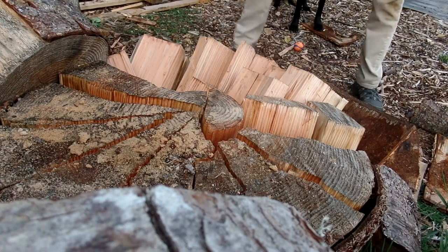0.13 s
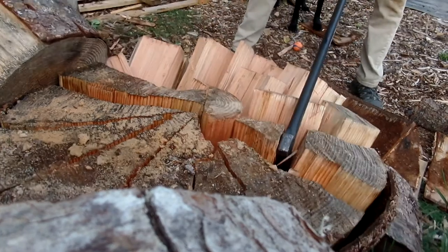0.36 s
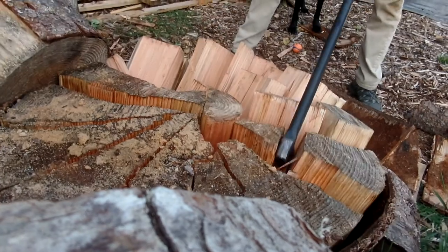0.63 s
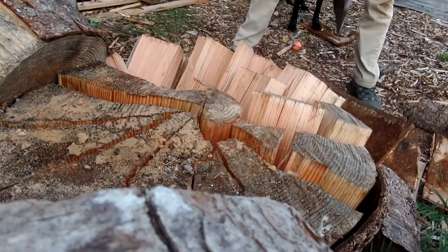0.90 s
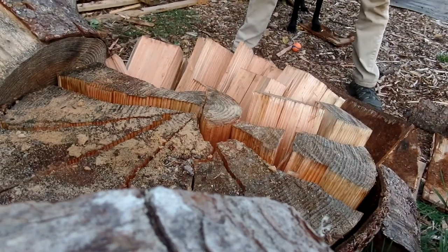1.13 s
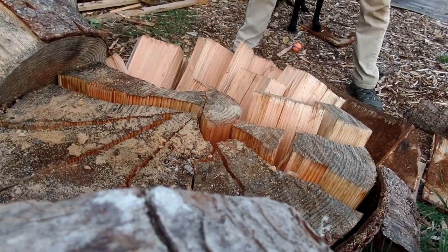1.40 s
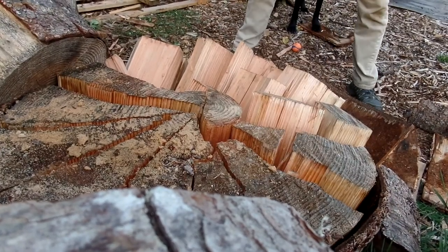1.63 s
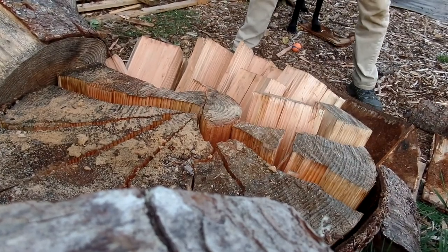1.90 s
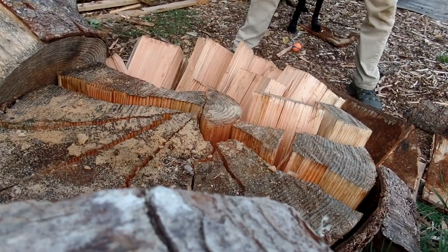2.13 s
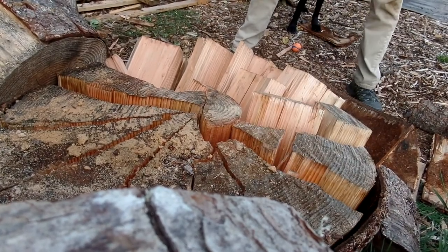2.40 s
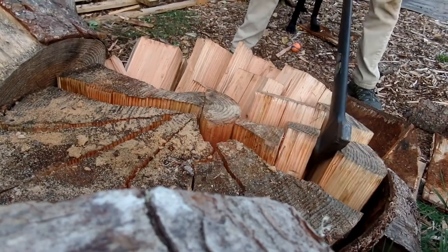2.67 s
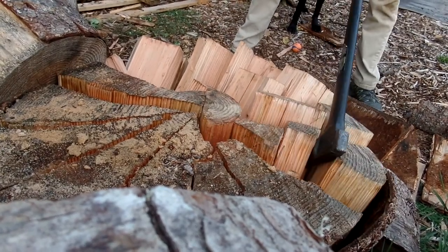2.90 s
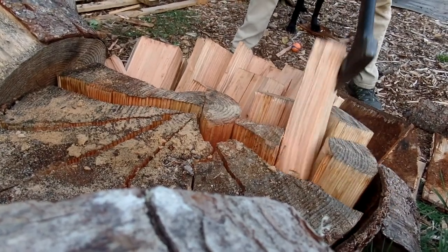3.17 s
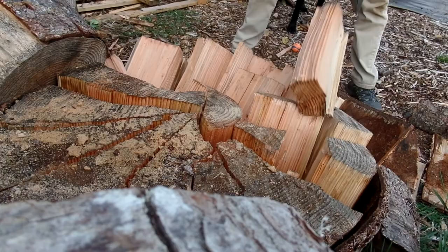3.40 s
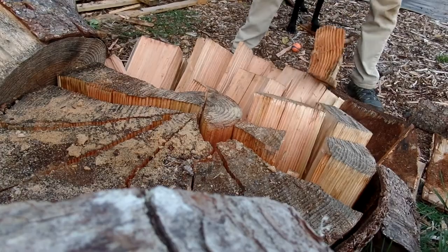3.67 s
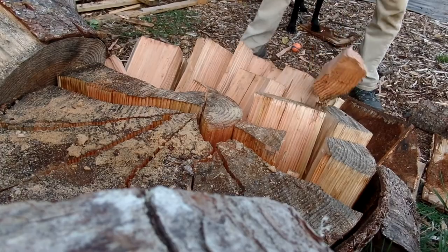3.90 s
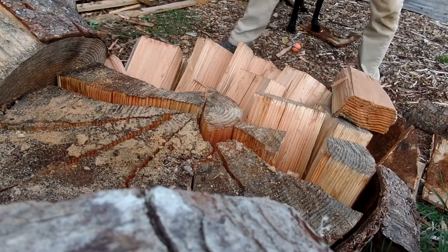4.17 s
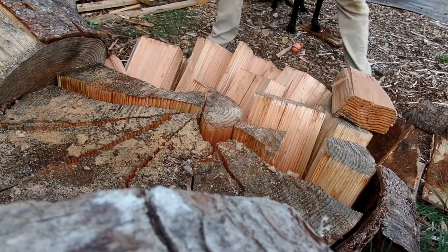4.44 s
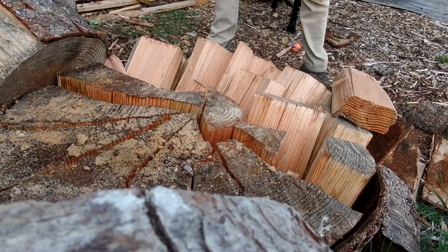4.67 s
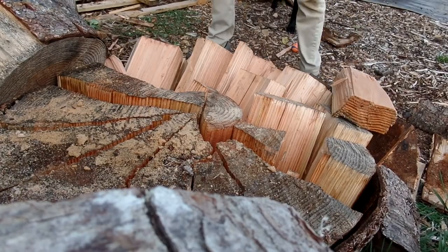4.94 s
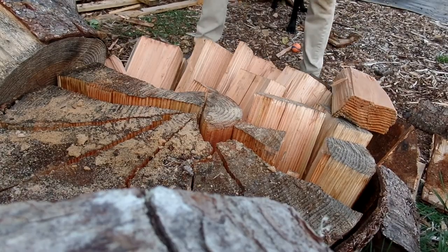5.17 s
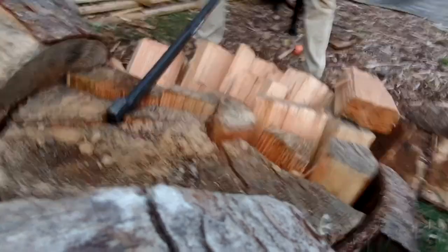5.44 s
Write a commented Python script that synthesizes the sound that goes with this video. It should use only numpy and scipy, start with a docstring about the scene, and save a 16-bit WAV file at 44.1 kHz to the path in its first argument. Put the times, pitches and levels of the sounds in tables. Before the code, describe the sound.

Three overloaded, splintering axe blows on thick wood, separated by rustling clothes, loose wooden clunks and the faint murmur of an open yard.

```python
"""Axe on a log round

An axe bites three times into a thick log round, close to a small microphone that overloads.
Blows and knocks are damped wooden modes; jolts of tearing fibre excite the blows and noise bursts crack above.
Around the blows split pieces knock and tumble, and the axe head drags out of a cut as grainy noise with squeaks.
Clothes and wood chips rustle as swells of bright noise with stray ticks.
Behind lie the shaped-noise murmur of an open yard, low breeze on the microphone and a faint far hum."""
import sys
import numpy as np
from scipy import signal
from scipy.io import wavfile
from scipy.ndimage import uniform_filter1d

SR = 44100
rng = np.random.default_rng(int(sys.argv[2]) if len(sys.argv) > 2 else 0)


def makeup_ratio(level_db):
    """Linear amplitude ratio for a level in decibels (20 dB per factor of ten)."""
    decades = np.asarray(level_db, float) / 20
    return 10 ** decades


def wav_record(signal):
    """Record a signal, one row per channel, as 16-bit PCM in the file named by sys.argv[1]."""
    frames = np.transpose(np.atleast_2d(signal))
    bounded = np.clip(frames, -1, 1)
    # unit amplitude maps onto the largest positive 16-bit level
    quanta = np.round(bounded * 32767).astype(np.int16)
    wavfile.write(sys.argv[1], SR, quanta)


N = 245183  # length [samples]

# Axe blows and the jolts of the splitting wood:
# (time [s], relative force [dB], tearing [s], relative splinter crack [dB], pitch factor of the piece)
AXE_BLOWS = [(0.3042, 11.5, .004, -5.5, 0.98), (.307, 13.5, .016, 4, 1.15),
             (0.3386, -7.5, 0.0022, -11, 1.3), (0.346, -14, 0.002, -25, 1.3),
             (0.357, -25, 0.011, -43, 1.15), (2.513, 9, .013, 5.5, 1.0), (2.533, -12, .006, -16, 0.83),
             (2.565, -30, 0.011, -37.5, 0.93), (5.445, 13, 0.019, 0, 1.07), (5.464, 8.5, .009, 0.5, 1.25),
             (5.481, -17.5, 0.0081, -30.5, 1.16), (5.492, -18, .02, -39, 1.78),
             (5.528, -24.5, 0.013, -30.5, 2.4)]
# Knocks of loose pieces; a piece and the one it lands on each ring:
# (time [s], ring peak [dB], nominal pitch [Hz], relative click [dB], ring t60 before neighbours damp it [s])
PIECE_KNOCKS = [(.188, -36.5, 784, -45.5, .06), (.196, -36, 1410, -50.5, 0.015),
                (.335, -5.5, 310, -52.5, 0.027), (.341, -5.5, 569, -34, 0.036),
                (.394, -27, 998, -55, 0.077), (.403, -30.5, 257, -46, 0.033),
                (.53, -49, 1290, -71.5, 0.033), (.542, -47.5, 242, -51.5, .037),
                (0.556, -59, 755, -55.5, 0.044), (.629, -47, 1730, -51.5, .032),
                (.661, -47, 603, -73, 0.021), (.731, -66, 1760, -53.5, .03),
                (.779, -35.5, 2810, -48, 0.022), (.787, -43, 492, -47.5, 0.029),
                (1.249, -43, 1210, -51, 0.011), (2.547, -10.5, 595, -23.5, 0.054),
                (2.593, -33, 471, -61, 0.067), (2.646, -31.5, 3110, -44.5, 0.015),
                (2.67, -32.5, 967, -52, 0.016), (2.805, -61, 903, -58.5, 0.012),
                (3.008, -61, 2898, -56.5, .012), (3.25, -51, 2020, -52.5, 0.015),
                (3.35, -54, 2000, -55, .015), (3.507, -48, 2830, -41.5, 0.012),
                (3.516, -27, 1234, -35, 0.021), (3.521, -26, 627, -58, 0.0095),
                (3.517, -26, 2900, -57.5, .005), (3.518, -31, 231.5, -54, 0.079),
                (3.615, -45, 261, -65, 0.084), (3.68, -49, 920, -63, 0.056),
                (3.699, -46, 840, -49.5, 0.027), (3.768, -38, 1216, -51.5, .02),
                (3.769, -37, 705, -64.5, 0.016), (3.791, -35, 210, -62, 0.051),
                (3.837, -48, 2740, -53.5, 0.018), (3.856, -30, 756, -44, 0.014),
                (3.875, -30, 1770, -37.5, 0.048), (3.897, -41, 2020, -35, 0.012),
                (3.905, -48, 1520, -46, .012), (3.939, -50, 870, -44, 0.029),
                (3.958, -55, 835, -45.5, 0.028), (4.011, -39, 1355, -57, 0.017),
                (4.14, -16, 420, -33.5, 0.062), (4.138, -13, 247, -45, 0.033), (4.18, -38, 390, -62, 0.051),
                (4.197, -33.5, 234, -64.5, 0.065), (4.201, -42.5, 430, -58.5, 0.057),
                (4.229, -40.5, 427, -66, .043), (4.608, -41, 825, -44, 0.026),
                (4.627, -37, 325, -54.5, 0.041), (4.645, -30, 268, -51.5, 0.031),
                (4.664, -33, 322, -54, 0.039), (4.675, -36.5, 270, -63, 0.056),
                (4.917, -41.5, 370, -54, 0.05), (5.223, -36, 557, -47, 0.022),
                (5.496, -37, 2920, -35.5, .01), (5.53, -33, 1510, -40, 0.028),
                (5.539, -28, 1646, -36, 0.053)]
# Modes of a reference piece of wood, the main one second:
# (frequency [Hz], level [dB], undamped t60 [s])
WOOD_MODES = [(180, -12, 0.031), (421, 4.5, 0.049), (565, -11, 0.14), (699, -4, 0.03), (844, -1.5, .045),
              (1000, -9.5, 0.013), (1290, -10.5, 0.063), (1386, -8.5, 0.032), (1770, -8.5, 0.052),
              (2377, -15.5, 0.051), (2970, -18, 0.024)]
# Colour of cracking splinters: (frequency [Hz], relative level [dB])
SPLINTER_COLOUR = [(1000, -11), (2500, -1), (4500, -4), (6500, -9), (9500, -4), (12000, -19.5),
                   (16000, -21)]
# Decay of the yard's echo tail: (frequency [Hz], t60 [s])
ECHO_DECAY = [(100, 0.27), (400, 0.065), (1500, 0.087), (4000, 0.14), (10000, 0.063)]
# Colour of the distant murmur: (frequency [Hz], relative density [dB/Hz])
MURMUR_COLOUR = [(15, -45), (25, -19), (76, -6.5), (349, -14), (483, -15), (787, -11.5), (1360, -15.5),
                 (1640, -14.5), (2090, -17), (2820, -19.5), (4600, -30.5), (11900, -48), (16500, -50)]
# Colour of clothes and chips: (frequency [Hz], relative density [dB/Hz])
RUSTLE_COLOUR = [(1470, -36), (2500, 0), (4010, -1.5), (4930, 1.5), (8430, 1), (9270, 6), (12000, -11),
                 (15100, -3.5), (16100, -11.5), (16500, -38.5)]
# Partials of the far hum, which ride on the murmur's level curve:
# (mean frequency [Hz], peak relative to that curve [dB])
HUM_PARTIALS = [(84, -9), (168, -5.5)]
# Colour of steel scraping wood: (frequency [Hz], relative density [dB/Hz])
SCRAPE_COLOUR = [(180, -43.5), (300, -9), (384, 2), (1660, 0), (2770, -2), (4400, -7.5), (9370, -11),
                 (12000, -35), (15600, -60), (22000, -120)]
# Faint thin tones: (start [s], length [s], frequency [Hz], bandwidth [Hz], level before fades [dB])
THIN_SQUEAKS = [(.795, .2, 1803, 90, -64), (.85, .12, 470, 120, -62), (.8, .16, 3660, 250, -71),
                (4.322, .21, 4230, 25, -72)]
# The open yard: (time [s], relative distant murmur [dB], relative breeze on the microphone [dB])
YARD_LEVELS = [(0, -58, -51.5), (.29, -51, -60), (.52, -62, -77), (.79, -60, -69), (1.12, -69, -63.5),
               (1.28, -61.5, -66.5), (1.6, -61, -58), (1.72, -55.5, -54.5), (2.08, -54, -50.5),
               (2.5, -55.5, -52), (2.62, -61.5, -68.5), (2.87, -70.5, -74), (3.0, -67, -77.5),
               (3.25, -62, -85), (3.45, -68.5, -68.5), (3.62, -60.5, -59), (3.87, -58.5, -58),
               (4.45, -57, -57), (4.6, -51.5, -58), (5.1, -55, -51.5), (5.43, -57.5, -54.5),
               (5.56, -41.5, -52)]
# Movements of clothes or feet on the chips: (start [s], hold [s], relative level [dB])
MOVEMENTS = [(.1, .05, -63), (.19, 0.015, -51.5), (0, 0.08, -68), (0.256, 0.11, -57.5), (.4, 0.038, -66.5),
             (0.694, 0.048, -65), (0.954, .03, -67.5), (1.131, .02, -70.5), (1.698, 0.13, -59),
             (1.92, 0.034, -54), (3.02, 0.04, -69.5), (3.116, 0.14, -65.5), (3.33, 0.3, -71.5),
             (3.632, 0.34, -76.5), (4.3, 0.18, -68.5), (4.004, 0.021, -65.5), (4.187, .02, -64.5),
             (4.577, 0.073, -53.5), (4.68, 0.11, -60), (4.79, .06, -54), (4.904, 0.14, -65),
             (5.223, 0.016, -62.5), (5.526, .05, -56)]

WOOD_HZ = 430  # nominal main pitch of the reference piece


def evened(x):
    """Scales to rms 1."""
    return x / np.sqrt(np.mean(x ** 2) + 1e-20)


def read(points, hz):
    """Reads a spectrum on a log-frequency axis."""
    f, value = np.transpose(points)
    return np.interp(np.log(hz + 1), np.log(f + 1), value)


def add(mix, s, sound):
    """Mixes a sound in at a time in seconds."""
    part = mix[round(s * SR):][:len(sound)]
    part += sound[:len(part)]


def curve(rows, column):
    """Draws one column of a level table sample by sample."""
    rows = np.array(rows)
    return np.interp(np.arange(N) / SR, rows[:, 0], rows[:, column])


def coloured(spectrum, patchy_db, flicker_db):
    """Noise of rms 1 with a spectrum, drifting patches and broadband flicker."""
    frames, hz = N // 128 + 5, np.fft.rfftfreq(512, 1 / SR)
    real, imaginary, patches = rng.standard_normal((frames, 257, 3)).T
    patches = uniform_filter1d(patches, 8, 0)  # smooth across frequency
    patches = evened(uniform_filter1d(patches, 20, 1))  # then across time
    flicker = evened(uniform_filter1d(rng.standard_normal(frames), 3))
    level_db = read(spectrum, hz)[:, None] + patchy_db * patches + flicker_db * flicker
    bins = (real + 1j * imaginary) * makeup_ratio(level_db)
    return evened(signal.istft(bins, nperseg=512, noverlap=384)[1][:N])


def wood(factor, damping=1):
    """Ring of a piece of wood as decaying sine modes; smaller pieces ring higher."""
    t = np.arange(round(.15 * SR)) / SR
    ring = np.zeros(len(t))
    for hz, db, t60 in WOOD_MODES:
        ring += makeup_ratio(db - 60 * t / (t60 * damping)) * np.sin(2 * np.pi * hz * factor * t)
    return ring


def struck(factor, damping, reach):
    """A soft contact leaves the upper modes out: a lowpass at reach times the main pitch."""
    lowpass = signal.butter(4, reach * WOOD_HZ * factor, fs=SR, output="sos")
    return signal.sosfilt(lowpass, wood(factor, damping))


def axe(splinters):
    """The edge touches, strikes, then fibres tear in a run of jolts that ring the round; splinters crack above."""
    out = np.zeros(N)
    t = np.arange(round(.15 * SR)) / SR
    for s, force_db, tear, crack_db, factor in AXE_BLOWS:
        at = round(s * SR)
        hits = rng.standard_normal(len(t)) * (rng.random(len(t)) < 2500 / SR)  # about 2500 per second
        jolts = hits * (t < tear) * 0.6
        jolts[0] = -1  # the strike itself
        reach = 2.5 * makeup_ratio(.4 * (force_db + 29.5))  # harder blows reach higher modes
        ring = signal.fftconvolve(jolts, struck(factor, .4, min(reach, 14)))
        add(out, s, makeup_ratio(force_db - 14.0) * ring)
        # A sharp snap over a crackle that holds through the tear
        snap = np.exp(-t / 0.0036) + 0.26 * np.exp(-np.maximum(t - tear, 0) / 0.0023)
        settling = makeup_ratio(-33.5) * np.exp(-t / .04)  # faint longer tail as chips settle
        add(out, s, makeup_ratio(crack_db - 4.5) * (snap + settling) * splinters[at - 8000:][:len(t)])
        touch = np.linspace(.3, 1, 110) * splinters[at:][:110]
        add(out, s - .0025, makeup_ratio(crack_db - 22.5) * touch)
    return signal.lfilter(*signal.butter(2, 110, "high", fs=SR), out)  # a log radiates little deep bass


def pieces(splinters):
    """Loose pieces knock: a short wooden ring and a gritty click."""
    out = np.zeros(N)
    t = np.arange(round(.15 * SR)) / SR
    swell = (1 - np.exp(-t / 0.0007)) * np.exp(-t / 0.0044)  # rise and decay of the grit
    for s, peak_db, hz, click_db, t60 in PIECE_KNOCKS:
        t60 = max(t60, .005)
        reach = 1.45 + 550 / hz * makeup_ratio(0.84 * (peak_db + 14))  # hard knocks on big pieces reach higher modes
        ring = struck(hz / WOOD_HZ, t60 / WOOD_MODES[1][2], reach)
        ring = ring * (1 - np.exp(-t / 0.0018))  # soft onset
        ring = ring * makeup_ratio(-35 * t / t60)  # the neighbours it lies on damp every mode
        add(out, s, makeup_ratio(peak_db) * ring / abs(ring).max())
        grains = splinters[round(s * SR):][:len(t)]
        add(out, s, makeup_ratio(click_db + 2.0) * swell[:len(grains)] * grains)
    return out


def drag():
    """The axe head drags out of the cut: grainy steel-on-wood noise swells and stops, with faint squeaks."""
    t = np.arange(N) / SR - .786  # from the moment the swell reaches -45 dB
    swell_db = 266 * t  # rises at 266 dB/s
    stop_db = -1800 * (t - .01)  # then drops at 1800 dB/s
    scrape = coloured(SCRAPE_COLOUR, patchy_db=2.5, flicker_db=2.5)
    out = makeup_ratio(-45 + np.minimum(swell_db, stop_db)) * scrape
    for start, length, hz, width, db in THIN_SQUEAKS:
        n = round(length * SR)
        band = signal.butter(1, [hz - width / 2, hz + width / 2], "band", fs=SR, output="sos")
        tone = evened(signal.sosfilt(band, rng.standard_normal(n)))  # narrow noise, so the tone wavers
        add(out, start, makeup_ratio(db) * tone * signal.windows.tukey(n, .2))
    return out


def echo(x):
    """Scattered returns from stacked logs and ground, each band dying at its own speed."""
    taps = np.zeros(SR // 2)
    at = np.arange(200, SR // 2 - 20, 20)
    taps[at + rng.integers(0, 20, len(at))] = rng.choice([-1., 1.], len(at))
    hz, t, bins = signal.stft(taps, SR, nperseg=256)
    decay_db = -60 * t / read(ECHO_DECAY, hz)[:, None]
    tail = signal.istft(bins * makeup_ratio(decay_db), SR, nperseg=256)[1]
    return signal.fftconvolve(x, tail / np.linalg.norm(tail))[:N]


def stirring():
    """Level of the rustle: each movement rises, holds and fades, and their powers add."""
    t = np.arange(N) / SR
    power = makeup_ratio(curve(YARD_LEVELS, 1) - 15) ** 2  # a thin rustle follows below the murmur
    for start, hold, db in MOVEMENTS:
        rise_db = 220 * np.maximum(start - t, 0)  # 220 dB/s up
        fall_db = 189 * np.maximum(t - start - hold, 0)  # 189 dB/s down
        power += makeup_ratio(db - (rise_db + fall_db)) ** 2
    return np.sqrt(power)


def rustle():
    """Clothes and chips move: bright noise swells while stray chips tick at random, each with a fast decay."""
    ticks_per_s, tick_db, tick_s = 9.7, -5, 0.0022  # mean rate, mean size against the rustle, decay time
    ticks = (rng.random(N) < ticks_per_s / SR) * makeup_ratio(tick_db) * rng.exponential(1, N)
    ticks = signal.lfilter([1], [1, -np.exp(-1 / (tick_s * SR))], ticks)
    return makeup_ratio(2.5) * stirring() * (1 + ticks) * coloured(RUSTLE_COLOUR, patchy_db=2.0, flicker_db=1.22)


def murmur():
    """Distant shaped noise and a hum of sine partials with wavering pitch, on one level curve."""
    waver = 1 + 0.018 * evened(uniform_filter1d(rng.standard_normal(N), 6000))
    hum = np.zeros(N)
    for hz, db in HUM_PARTIALS:
        hum += makeup_ratio(db) * np.sin(2 * np.pi * hz * np.cumsum(waver) / SR)
    noise = makeup_ratio(0.5) * coloured(MURMUR_COLOUR, patchy_db=1.5, flicker_db=0.76)
    return makeup_ratio(curve(YARD_LEVELS, 1)) * (noise + hum)


def breeze():
    """Air buffets the microphone: lumpy low noise between 35 and 120 Hz."""
    band = signal.butter(2, [35, 120], "band", fs=SR, output="sos")
    gusts = evened(signal.sosfilt(band, rng.standard_normal(N)))
    return makeup_ratio(curve(YARD_LEVELS, 2) - 3) * gusts


def scene():
    """Blows and knocks with their echo, then the drag, over rustle and yard."""
    splinters = coloured(SPLINTER_COLOUR, patchy_db=1.0, flicker_db=3.5)
    blows, knocks = axe(splinters), pieces(splinters)
    echoes = makeup_ratio(-27) * echo(blows) + makeup_ratio(-19.0) * echo(knocks)
    yard = murmur() + rustle() + breeze()
    return (blows + knocks + echoes + drag() + yard)[None]


def top_cut(x):
    """Nothing passes above the cut-off."""
    return signal.sosfilt(signal.butter(12, 16850, fs=SR, output="sos"), x)


def record(dry):
    """The input stage hisses and softly flattens the blows; a bass cut and a treble lift follow it."""
    hiss_db, ceiling_db = -78.5, -6.5  # both ahead of the bass cut and treble lift
    loud = dry + makeup_ratio(hiss_db) * coloured(RUSTLE_COLOUR, patchy_db=1.0, flicker_db=0.0)
    flat = loud / (1 + abs(loud / makeup_ratio(ceiling_db)) ** 4) ** (1 / 4)
    bass_cut = signal.lfilter(*signal.butter(1, 75, "high", fs=SR), flat)
    treble = signal.lfilter(*signal.butter(1, 4000, "high", fs=SR), bass_cut)
    finished = bass_cut + 0.27 * treble
    return top_cut(finished)


dry = scene()
out = record(dry)
wav_record(out)
```